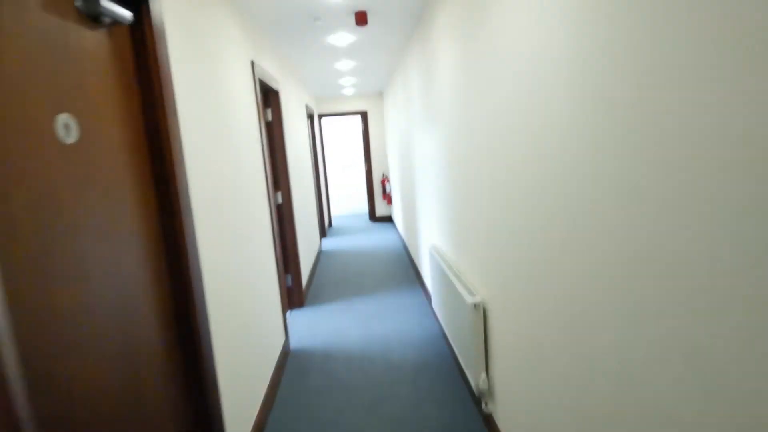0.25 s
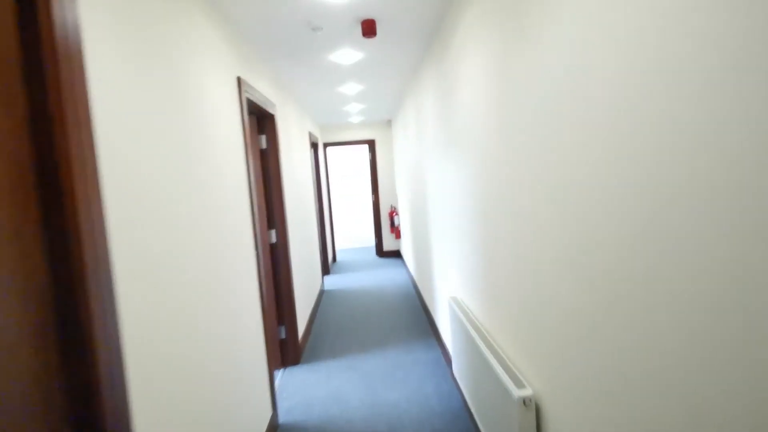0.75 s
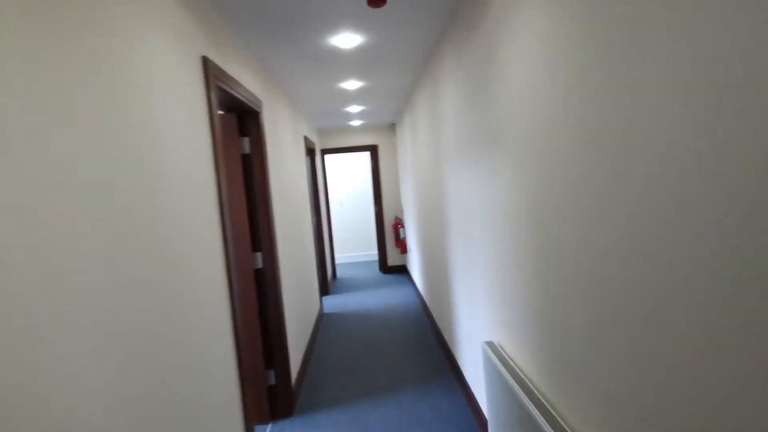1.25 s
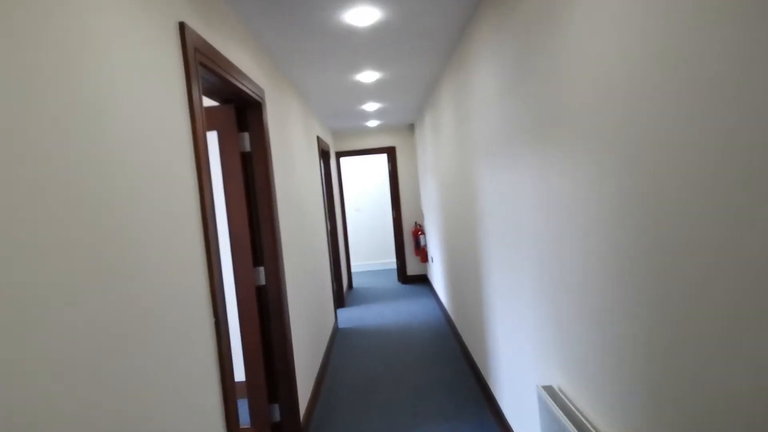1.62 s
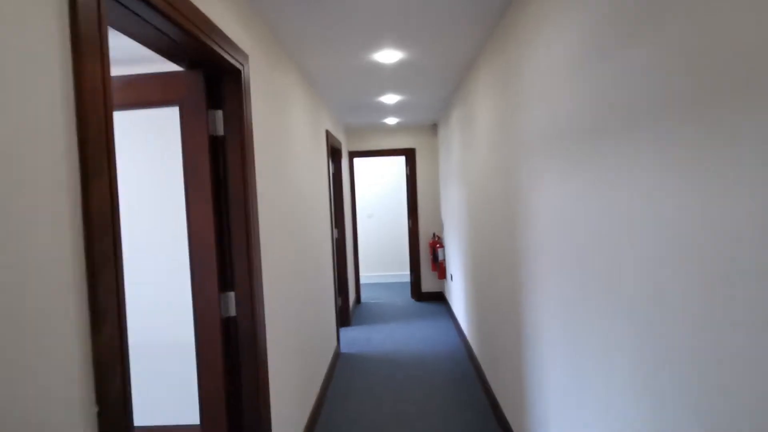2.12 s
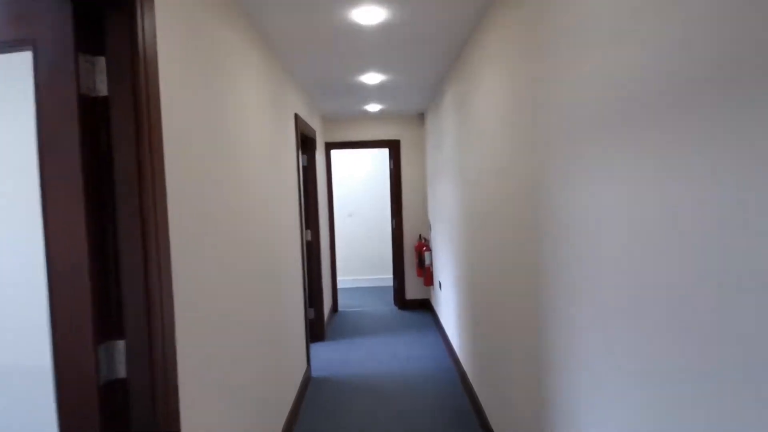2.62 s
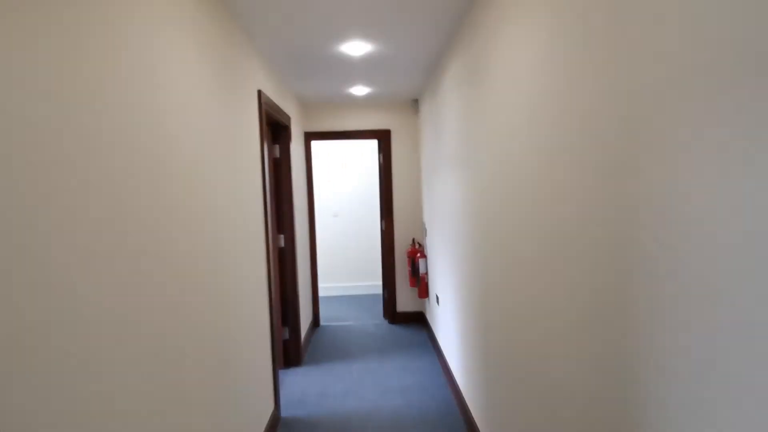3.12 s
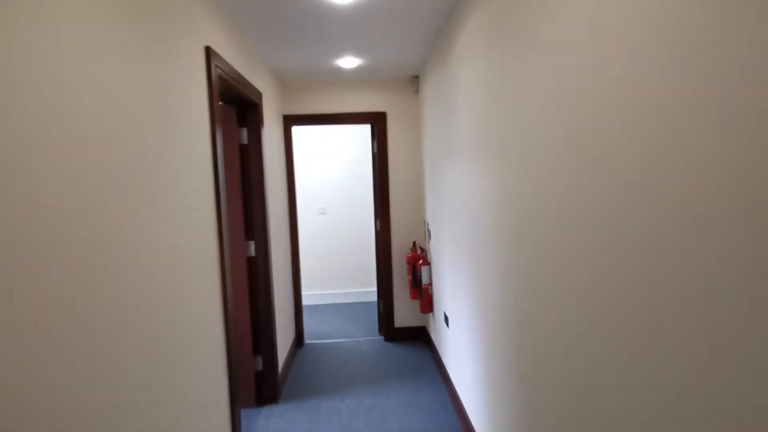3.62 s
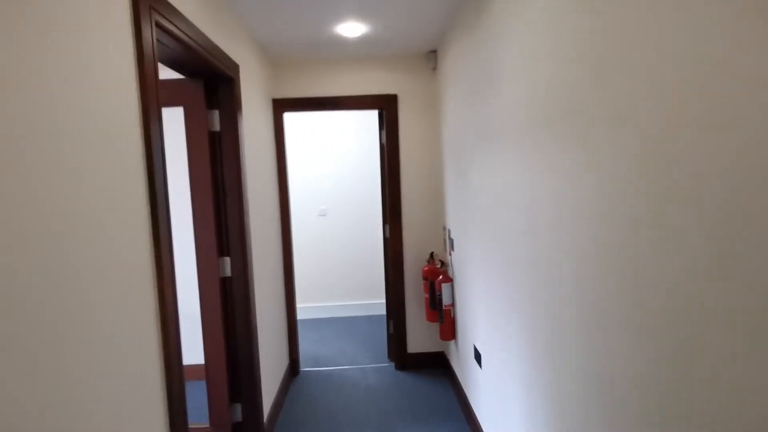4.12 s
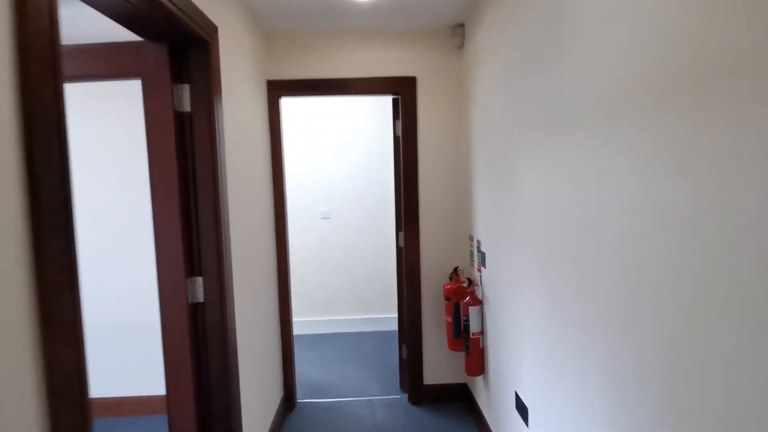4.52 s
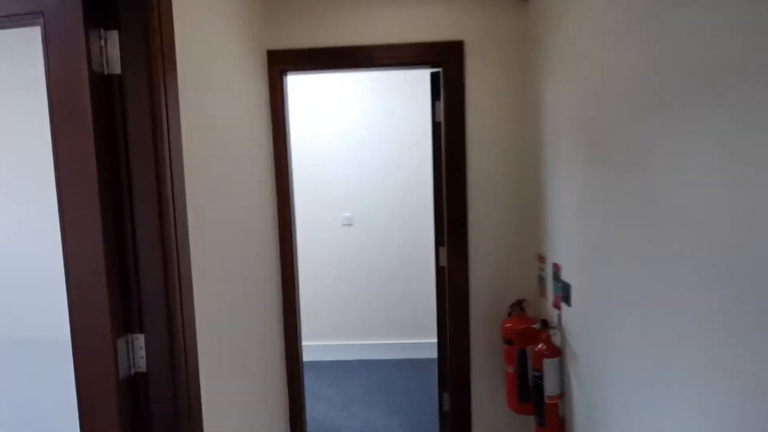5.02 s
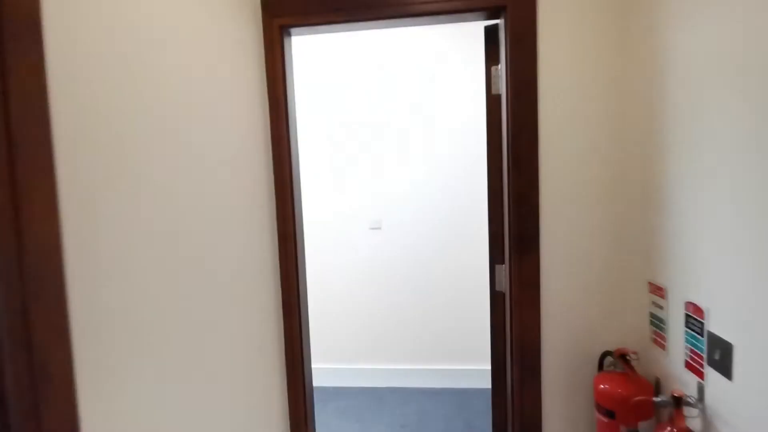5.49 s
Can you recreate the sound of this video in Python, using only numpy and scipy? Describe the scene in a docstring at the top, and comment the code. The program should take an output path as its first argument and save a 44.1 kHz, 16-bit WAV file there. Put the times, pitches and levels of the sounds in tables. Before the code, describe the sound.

A hand-held microphone moves along a bare-walled, carpeted corridor. Dull low treads come at just under two a second, one shoe clicking, the other patting softly. A tiny rubber squeak comes early, then a sharp wooden knock just after one second, by far the loudest event, rings briefly down the hall. Soft airy hisses swell and fade, and low hand rumble follows the steps.

```python
"""A shoe clicks amid a soft hiss that swells and fades: someone walks a carpeted corridor with a hand-held camera.
At a little under two steps a second, filtered noise makes a dull tread and jolts the hand's low rumble.
Impulses with gritty noise make the slap of the soles: one shoe clicks, the other pats and once squeaks by stick-slip.
One sharp knock excites wood resonances and rings down the corridor; shaped noise makes soft hisses,
short impacts small bright ticks, and steady coloured noise the corridor air and a faint background hiss."""
import sys
import numpy as np
from scipy import signal
from scipy.fft import rfft, irfft, next_fast_len
from scipy.io import wavfile
from scipy.ndimage import map_coordinates

SR = 44100
rng = np.random.default_rng(int(sys.argv[2]) if len(sys.argv) > 2 else 0)


def output_pcm(signal):
    """Save a mono or channel-first signal as 16-bit PCM at the path in sys.argv[1].

    Samples are clipped to [-1, 1] before scaling.
    """
    pcm = np.clip(np.atleast_2d(signal).T, -1, 1) * 32767
    wavfile.write(sys.argv[1], SR, np.round(pcm).astype(np.int16))


N = 253575
EVENT_TIME = np.arange(SR) / SR  # s, time within one event

# Footfalls: (time [s], tread level [dB], tread length [s], camera jolt level [dB])
STEPS = [(0.171, -55, 0.085, -64), (0.588, -54.5, 0.055, -58), (0.886, -52.5, 0.12, -56),
         (1.561, -55.5, 0.15, -52.5), (2.131, -59.5, 0.21, -58), (2.753, -58.5, 0.12, -54),
         (3.298, -55, 0.26, -55), (3.844, -50, 0.091, -54.5), (4.395, -47.5, 0.091, -56),
         (4.949, -49.5, 0.051, -52.5), (5.525, -56, 0.11, -65)]
# A sole dragging over the pile: (time [s], level [dB], length [s], pitch [Hz], hollow voice level [dB])
SCUFFS = [(.229, -47, 0.03, 3630, -52), (.59, -56.5, 0.067, 1440, -58), (.907, -64.5, 0.12, 2980, -60.5),
          (2.795, -64.5, 0.076, 1630, -65.5), (3.626, -49, 0.035, 3330, -49),
          (4.573, -49.5, .013, 1930, -73), (5.02, -58.5, 0.074, 1740, -62)]
# Slaps of the clicking shoe: (time [s], click level [dB], body level [dB], echo level against the click [dB])
CLICKS = [(.009, -48.5, -46.5, 2.5), (.256, -46.5, -48, -12), (2.3765, -42.5, -55, 0),
          (2.3893, -38.5, -42.5, -4), (2.552, -57, -60, -4), (3.511, -36, -63, -8.5), (3.517, -47, -69, 2),
          (3.532, -42.5, -52, 0), (4.589, -46.5, -45, -6), (4.715, -57.5, -49.5, 4.5),
          (4.752, -54, -66, -5), (5.711, -48.5, -46, 3.5)]
# Slaps of the soft shoe: (time [s], level [dB], edge level against it [dB])
PATS = [(0.654, -40, -11), (0.906, -49, -7), (1.818, -45.5, -8.5), (1.955, -52, -20), (2.967, -46.5, -15),
        (4.076, -45.5, -20), (5.182, -47, -10.5)]
# Contacts within the knock: (time [s], crack level [dB], wood level [dB])
KNOCK_CONTACTS = [(1.187, -28, -30), (1.1893, -28, -26), (1.1923, -29.5, -25), (1.199, -51, -29)]
# Soft hisses that swell and fade: (time [s], level [dB], length [s], stressed frequency [Hz])
SOFT_HISSES = [(0, -54.5, 0.6, 7900), (0.639, -69, 0.74, 7060), (1.401, -56.5, 0.45, 5930),
               (3.052, -61, 0.25, 9000), (3.26, -55, 0.17, 9000), (3.399, -55.5, 0.64, 9140),
               (3.949, -58.5, 0.18, 8900), (4.06, -63, 0.31, 8900), (4.383, -63.5, 0.077, 8350),
               (4.819, -65, 0.29, 4300)]
# Small bright ticks, some sharpening the shoe's clicks: (time [s], level [dB], pitch [Hz])
TICKS = [(.652, -57, 7200), (1.956, -53, 3800), (1.976, -53, 3800), (4.536, -49.5, 9800),
         (4.589, -53, 5000), (4.715, -56, 2400), (4.752, -57, 4800)]
# The hand shifting its grip: (time [s], level [dB], length [s])
REGRIPS = [(0.476, -49.5, 0.095), (1.184, -55, 0.35), (2.669, -45, 0.1), (2.97, -47.5, 0.053)]

# Resonances of the corridor in the bass: (frequency [Hz], width [Hz], level [dB])
CORRIDOR_MODES = [(152.4, 24, -2), (209.7, 10.5, 4.5), (312.5, 31.4, 1)]
# Resonances of the hollow under the soft shoe: (frequency [Hz], width [Hz], level [dB])
ARCH_MODES = [(430, 81, 0.5), (537, 98, 0.5), (710, 145, -5)]
# Resonances of the squeaking sole: (frequency [Hz], width [Hz], level [dB])
RUBBER_MODES = [(947, 153, 17.5), (1610, 1340, 0), (2770, 200, 4), (4360, 600, -1.5), (5080, 140, 4.5),
                (5990, 230, 6)]
# Resonances of the knocked wood: (frequency [Hz], width [Hz], level [dB])
WOOD_MODES = [(135, 44, 3), (221, 63, 1.5), (383, 46, 0.5), (533, 93, 2), (804, 110, -1), (1296, 170, -0.5),
              (1680, 210, -1), (1990, 140, 4.5), (2250, 270, 5.5), (2850, 530, 2), (4100, 300, -41),
              (6520, 120, -5.5)]

# Spectrum of a heel or rolling foot on carpet: (frequency [Hz], level [dB])
TREAD_SPECTRUM = [(30, 6.5), (90, 2.5), (140, 1), (220, 0.5), (330, -2.5), (460, -11), (800, -27.5),
                  (2000, -22), (8000, -57)]
# Spectrum of the hard click: (frequency [Hz], level [dB])
CLICK_SPECTRUM = [(100, -29), (700, 5), (1300, 3.5), (2000, 9.5), (2900, -2), (4000, -7.5), (7000, -13),
                  (10500, -9), (13000, -14), (16000, -19)]
# Spectrum of a sole's body: (frequency [Hz], level [dB])
SOLE_SPECTRUM = [(60, -1), (280, -1.5), (480, 5), (680, 2), (1000, -7), (2000, -7), (5000, -62),
                 (16000, -70)]
# Spectrum of the knock's crack and the soft shoe's edge: (frequency [Hz], level [dB])
CRACK_SPECTRUM = [(100, 2.5), (1000, -9), (3000, -7), (4300, -7), (6800, -7), (8000, -9.5), (11000, -7.5),
                  (13000, -15.5), (16000, -19)]
# Spectrum shared by the soft hisses: (frequency [Hz], level [dB])
SOFT_HISS_SPECTRUM = [(300, 13), (1500, -7), (2150, 12.5), (3000, -4.5), (4400, 3), (5400, -4.5),
                      (6900, -1), (8200, -4.5), (9700, -4), (10800, 1), (12500, -4.5), (16000, -6)]
# Spectrum of the hand on the camera: (frequency [Hz], level [dB])
RUMBLE_SPECTRUM = [(10, 0), (26, -1), (38, -3), (52, -1), (80, -22.5), (130, -16), (400, -59)]
# Spectrum of the corridor air: (frequency [Hz], level [dB])
AIR_SPECTRUM = [(35, -26), (60, -0.5), (150, -11), (189, -6.5), (279, -9), (472, -8.5), (538, -12.5),
                (613, -13.5), (797, -11), (879, -16), (1050, -17), (2230, -16.5), (3000, -46), (3900, -42),
                (6600, -120)]
# Spectrum of the faint background hiss: (frequency [Hz], level [dB])
BACKGROUND_HISS_SPECTRUM = [(1500, -10), (2200, 1.5), (3000, -0.5), (5500, -4.5), (6800, -4), (9000, -9),
                            (10700, -7), (13000, -13), (16000, -11)]
# Reverberation of the corridor: (frequency [Hz], time to decay by 60 dB [s])
CORRIDOR_T60 = [(100, .52), (300, .56), (700, .71), (1500, .68), (2700, .52), (4000, .47), (8000, .39),
                (14000, .28)]
# Likeness of left and right in diffuse sound: (frequency [Hz], correlation [0 to 1])
LIKENESS = [(60, 0.77), (300, 0.97), (640, 0.57), (1400, 0.022), (15000, 0.083)]
# Balance of the two ports: (frequency [Hz], left over right [dB])
BALANCE = [(60, 2.5), (180, 0), (300, 1), (500, -4.5), (1200, -4), (2400, -8), (4300, 2), (8000, -3.5),
           (15000, -4.5)]

HEEL_DB, PILE_DB = -2.5, -14.5  # heel bump and brushed pile, against the tread
HOLLOW_HZ = 620  # the low voice of a dragging sole
CLICK_THUD_DB, PAT_THUD_DB, THUD_S = -12, -13, 0.024  # the forefoot comes down with each slap
PAT_TAP_DB = -5  # first touch of the soft shoe
PAT_PUFF_DB, PUFF_S = -6, 0.025  # air pressed from under its sole
KNOCK_PAN_DB = 0.5  # the crack lies to the right: this much up there, and down at left
SWELL_POWER, FOCUS_DB = 0.91, 11.5  # sharpness of a soft hiss's swell; stress on one band
JOLT_LAG_S, JOLT_RISE_S, JOLT_HOLD_S, JOLT_FALL_S = 0.02, 0.035, 0.15, 0.12  # a step travels up the arm
GRIP_DB, GRIP_SETTLES_DB_PER_S = -58, 1.8  # steady rumble of the hand, from its starting level
AIR_DB = -62
BACKGROUND_HISS_DB, HISS_FADE_DB_PER_S = -66.5, 0.49  # the hiss thins along the corridor
TOP_HZ = 16000  # band limit


def treads(pile_hz=900):
    """Damped impact: carpet swallows each heel's bump into a low lumpy thud, and the sole brushes the pile."""
    out = np.zeros((2, N))
    for start, level_db, length, _ in STEPS:
        heel = contact(colour(TREAD_SPECTRUM), t60=0.057, rough=1.0, wet_db=-7)
        pile = stroke(hump(pile_hz), length, rise=0.017, fall=0.052, lumpy_db=8, lump_rate=400)
        tread = thud(length) + amp(HEEL_DB) * heel + amp(PILE_DB) * pile
        add(out, start, amp(level_db) * tread)
    return out


def scuffs():
    """Sliding friction: a dragging sole makes noise at one pitch and in a low hollow voice."""
    out = np.zeros((2, N))
    for start, level_db, length, hz, hollow_db in SCUFFS:
        pile = amp(level_db) * brush(hz, length)
        hollow = amp(hollow_db) * brush(HOLLOW_HZ, length)
        add(out, start, pile + hollow)
    return out


def clicking_shoe():
    """Hard impact: a brief blow excites a bright click and the duller body of the sole, over a short thud."""
    out = np.zeros((2, N))
    for start, click_db, body_db, room_db in CLICKS:
        click = contact(colour(CLICK_SPECTRUM), t60=0.047, rough=1.5, wet_db=room_db)
        sole = contact(colour(SOLE_SPECTRUM), t60=0.11, rough=1.4, wet_db=2)
        body = sole + amp(CLICK_THUD_DB) * thud(THUD_S)
        add(out, start, amp(click_db) * click + amp(body_db) * body)
    return out


def soft_shoe():
    """Cavity resonance: a soft tap presses air through the hollow of the sole, with a rough edge and a thud."""
    out = np.zeros((2, N))
    for start, level_db, edge_db in PATS:
        tap = contact(colour(SOLE_SPECTRUM), t60=0.036, rough=2.6, wet_db=-4.5)
        puff = stroke(resonant(ARCH_MODES), PUFF_S, rise=0.0034, fall=0.021, lumpy_db=1, lump_rate=143)
        puff = corridor(puff, wet_db=-4.5)
        edge = contact(colour(CRACK_SPECTRUM), t60=0.036, rough=3.9, wet_db=3)
        pat = amp(PAT_TAP_DB) * tap + amp(PAT_PUFF_DB) * puff
        pat = pat + amp(edge_db) * edge + amp(PAT_THUD_DB) * thud(THUD_S)
        add(out, start, amp(level_db) * pat)
    return out


def squeak(start=0.579, length=0.026, slip_rate=400, level_db=-44):
    """Stick-slip friction: rubber slips unevenly, hardest mid-slide, and each slip excites its resonances."""
    slips, out = np.zeros((2, SR)), np.zeros((2, N))
    times = np.arange(0, length, 1 / slip_rate)
    grip = np.sin(np.pi * (times + 0.5 / slip_rate) / (length + 1 / slip_rate))
    times += rng.uniform(0, 0.5, len(times)) / slip_rate
    slips[:, (times * SR).astype(int)] = grip * rng.uniform(0.064, 1, (2, len(times)))
    sound = unit(filtered(slips, resonant(RUBBER_MODES))) * np.sqrt(length)
    add(out, start, amp(level_db) * corridor(sound, wet_db=-2.5))
    return out


def knock():
    """Modal excitation: a hard blow chatters for some milliseconds, rings the wood and fills the corridor."""
    out = np.zeros((2, N))
    pan_db = KNOCK_PAN_DB * np.array([[-1], [1]])
    for start, crack_db, wood_db in KNOCK_CONTACTS:
        crack = contact(colour(CRACK_SPECTRUM), t60=0.015, rough=16, wet_db=-4)
        wood = contact(resonant(WOOD_MODES), t60=0.014, rough=1, wet_db=1)
        add(out, start, amp(crack_db + pan_db) * crack)
        add(out, start, amp(wood_db) * wood)
    return out


def soft_hisses():
    """Amplitude modulation: uneven coloured noise swells and fades in a half-sine, each stressed at one pitch."""
    out = np.zeros((2, N))
    for start, level_db, length, hz in SOFT_HISSES:
        focus = [(hz / 2.1, 0), (hz, FOCUS_DB), (hz * 1.39, 0)]
        uneven = diffuse(SR) * amp(0.6 * wobble(42, SR))
        hiss = unit(filtered(uneven, lambda f: amp(along(SOFT_HISS_SPECTRUM, f) + along(focus, f))))
        half_sine = np.abs(np.sin(np.pi * np.minimum(EVENT_TIME / length, 1)))
        add(out, start, amp(level_db) * half_sine ** SWELL_POWER * hiss)
    return out


def small_ticks():
    """Damped resonance: small bright ticks, some sharpening the shoe's clicks, ring broadly and briefly."""
    out = np.zeros((2, N))
    for start, level_db, hz in TICKS:
        body = resonant([(hz, 1100, 0), (1500, 900, -4), (4500, 1800, -17)])
        add(out, start, amp(level_db) * contact(body, t60=0.016, rough=3, wet_db=-8))
    return out


def hand():
    """Power addition: steady grip, jolts after each step and shifts of grip sum as the power of one rumble."""
    time = np.arange(N) / SR
    power = amp(GRIP_DB - GRIP_SETTLES_DB_PER_S * time)[None] ** 2
    for start, _, _, jolt_db in STEPS:
        jolt = amp(jolt_db) * swell(JOLT_HOLD_S, JOLT_RISE_S, JOLT_FALL_S)
        add(power, start + JOLT_LAG_S, jolt ** 2)
    for start, level_db, length in REGRIPS:
        shift = amp(level_db) * swell(length, rise=0.025, fall=0.035)
        add(power, start, shift ** 2)
    return np.sqrt(power) * unit(filtered(diffuse(N), colour(RUMBLE_SPECTRUM)))


def corridor_air():
    """Diffuse field: low coloured noise, partly alike at both ports, wavers slightly as still corridor air."""
    level = amp(AIR_DB + 0.53 * wobble(7.4, N))
    return level * unit(filtered(diffuse(N), colour(AIR_SPECTRUM)))


def background_hiss():
    """Uncorrelated noise: each port has its own faint hiss, which fades steadily."""
    level = amp(BACKGROUND_HISS_DB - HISS_FADE_DB_PER_S * np.arange(N) / SR)
    noise = rng.standard_normal((2, N))
    return level * unit(filtered(noise, colour(BACKGROUND_HISS_SPECTRUM)))


def thud(length, boom_db=7):
    """Forced resonance: weight rolls onto the carpet, low and lumpy, and the corridor's low modes boom with it."""
    def body(hz):
        carpet = amp(along(TREAD_SPECTRUM, hz))
        boom = amp(boom_db) * np.abs(resonant(CORRIDOR_MODES)(hz))
        return np.hypot(carpet, boom)
    roll = stroke(body, length, rise=0.0098, fall=0.039, lumpy_db=2, lump_rate=68.0)
    return corridor(roll, wet_db=-4.5)


def brush(hz, length):
    """Sliding friction: a sole rubs over the pile, heard with its echo."""
    slide = stroke(hump(hz), length, rise=0.012, fall=0.024, lumpy_db=2.5, lump_rate=400)
    return corridor(slide, wet_db=-3.5)


def hump(hz):
    """Spectral envelope: brushed pile peaks at one pitch and falls off to both sides."""
    points = [(hz / 8, -16), (hz / 1.8, -8), (hz, 0), (hz * 1.45, -9), (hz * 4, -26)]
    return lambda f: amp(along(points, f))


def contact(response, t60, rough, wet_db, grit_hz=450):
    """Impact: a push and a short gritty crush through a body, as strong as 5 ms at rms 1, plus its echo."""
    push = signal.unit_impulse(SR)[None]
    decaying = diffuse(SR) * amp(-60 * EVENT_TIME / t60)
    crush = filtered(decaying, lambda hz: 1j * hz / (grit_hz + 1j * hz))  # high-pass
    direct = unit(filtered(push + rough * crush / np.linalg.norm(crush[0]), response))
    # the walls gather sound from all directions, so they answer with the body's mean colour
    reflected = amp(wet_db) * echo(unit(filtered(push, response)))
    return (direct + reflected) * np.sqrt(0.005)


def stroke(response, length, rise, fall, lumpy_db, lump_rate):
    """Friction: uneven noise through a body swells, lasts and dies."""
    uneven = diffuse(SR) * amp(lumpy_db * wobble(lump_rate, SR))
    return swell(length, rise, fall) * unit(filtered(uneven, response))


def swell(length, rise, fall):
    """Exponential relaxation: an envelope rises, holds and dies, with time constants in seconds."""
    return (1 - np.exp(-EVENT_TIME / rise)) * np.exp(-np.maximum(EVENT_TIME - length, 0) / fall)


def corridor(x, wet_db):
    """Superposition: a direct sound together with its echo."""
    return x + amp(wet_db) * echo(x)


def echo(x, build=0.004):
    """Reverberation: bare walls answer with noise decaying at each pitch's own rate, new for every sound."""
    hz, t, z = signal.stft(diffuse(SR), SR, nperseg=256)
    decay = amp(-60 * t / along(CORRIDOR_T60, hz)[:, None])
    tail = signal.istft(z * decay, SR, nperseg=256)[1][:, :SR]
    tail *= 1 - np.exp(-EVENT_TIME / build)
    return signal.fftconvolve(x, tail / np.linalg.norm(tail[0]), axes=1)[:, :SR]


def diffuse(size):
    """Spatial coherence: noise as two ports hear it in a room, alike chiefly in the bass."""
    def mid_side(hz):
        turn = np.arccos(np.clip(along(LIKENESS, hz), -1, 1)) / 2
        return np.array([np.cos(turn), np.sin(turn)])
    mid, side = filtered(rng.standard_normal((2, size)), mid_side)
    return np.array([mid + side, mid - side])


def resonant(modes):
    """Modal superposition: the response of (Hz, width, dB) resonances, added with alternating sign."""
    def response(f):
        total = 0
        for k, (centre, width, db) in enumerate(modes):
            damping = 1j * f * width
            total = total + (-1) ** k * amp(db) * damping / (centre * centre - f * f + damping)
        return total
    return response


def colour(points):
    """Minimum phase: the causal response with this spectrum, by folding its cepstrum."""
    def response(hz):
        cepstrum = irfft(np.log(amp(along(points, hz))))
        cepstrum[1:len(hz) - 1] *= 2
        cepstrum[len(hz):] = 0
        return np.exp(rfft(cepstrum))
    return response


def filtered(x, response):
    """Linear filtering: x times a response of frequency."""
    m = 2 * next_fast_len(x.shape[-1] // 2 + 4096)  # even, with room for ringing
    return irfft(rfft(x, m) * response(np.fft.rfftfreq(m, 1 / SR)), m)[..., :x.shape[-1]]


def wobble(rate, size):
    """Slow modulation: a smooth random curve with this many knots a second."""
    knots = rng.standard_normal(int(size * rate / SR) + 4)
    return map_coordinates(knots, [np.arange(size) * rate / SR])


def along(points, hz):
    """Logarithmic pitch: (Hz, value) points read on a log axis."""
    f, v = np.transpose(points)
    return np.interp(np.log(hz + 1), np.log(f + 1), v)


def unit(x):
    """Normalization: x at rms 1."""
    return x / np.sqrt(np.mean(x ** 2) + 1e-20)


def amp(db):
    """Level law: decibels to amplitude gain."""
    return 10 ** (np.asarray(db) / 20)


def add(track, start, sound):
    """Superposition: mix a sound in at its start time in seconds."""
    part = track[:, max(round(start * SR), 0):][:, :sound.shape[-1]]
    part += sound[..., :part.shape[-1]]


def scene():
    """Superposition: the walk down the corridor is the sum of its sources."""
    walk = treads() + scuffs() + clicking_shoe() + soft_shoe() + squeak()
    return walk + knock() + soft_hisses() + small_ticks() + hand() + corridor_air() + background_hiss()


def record(dry):
    """Transducer response: the ports differ in gain with frequency, and a steep low-pass limits the band."""
    ports = filtered(dry, lambda hz: amp(np.outer([1, -1], along(BALANCE, hz)) / 2))
    low_pass = signal.ellip(10, 0.2, 80, TOP_HZ, fs=SR, output="sos")
    return signal.sosfilt(low_pass, ports)


dry = scene()
out = record(dry)
output_pcm(out)
```